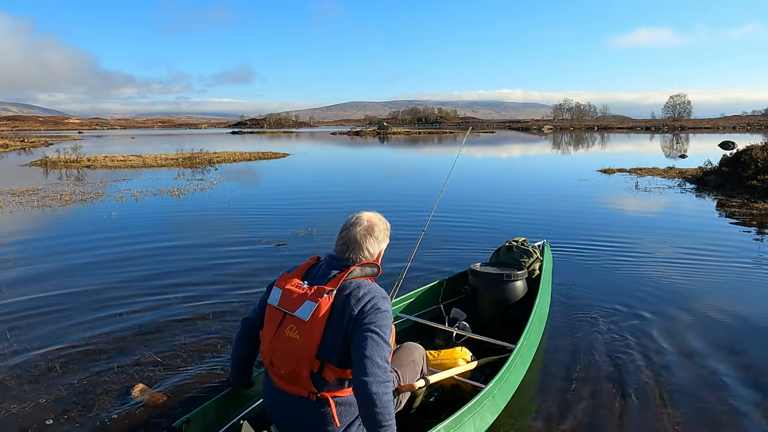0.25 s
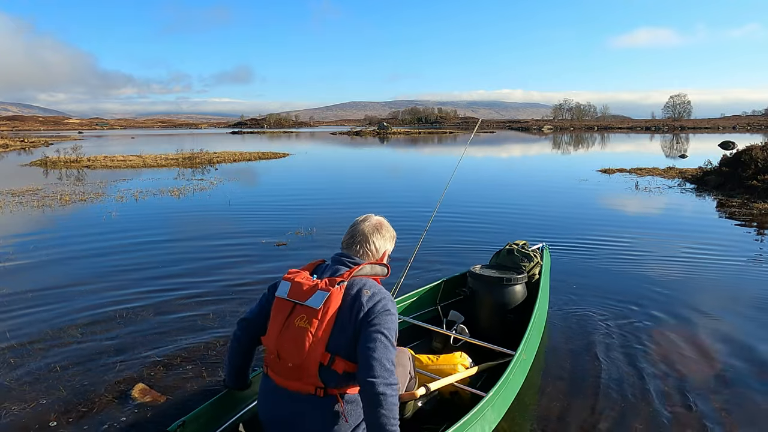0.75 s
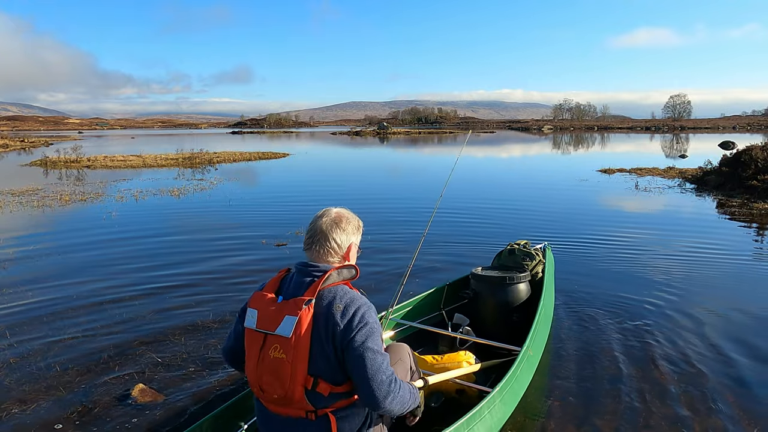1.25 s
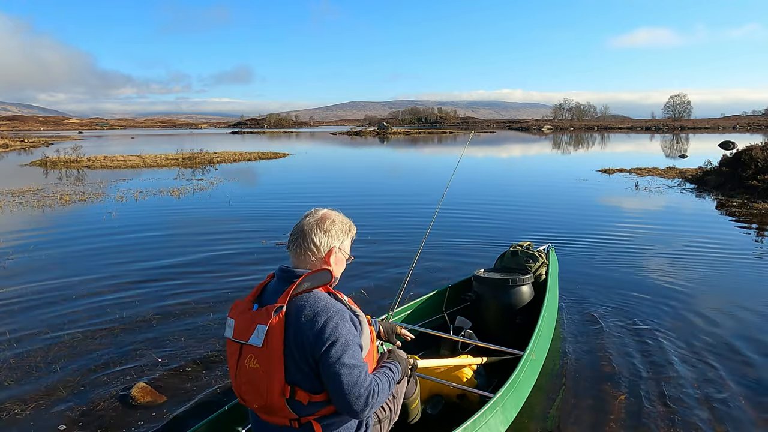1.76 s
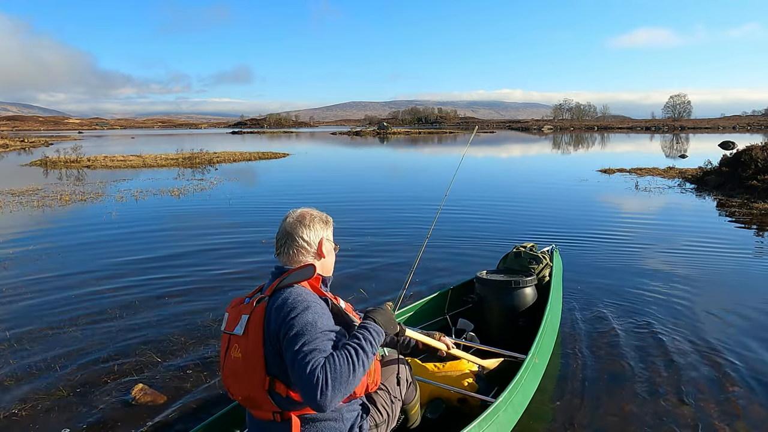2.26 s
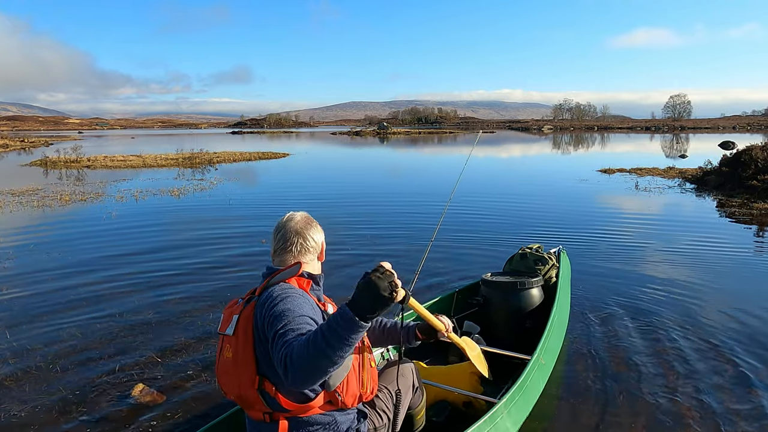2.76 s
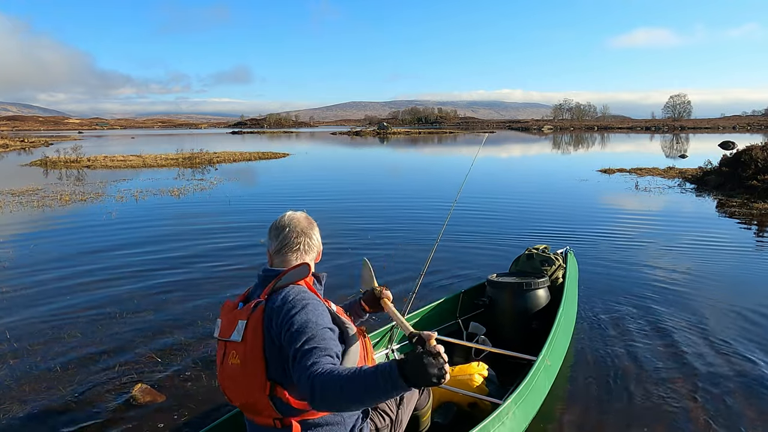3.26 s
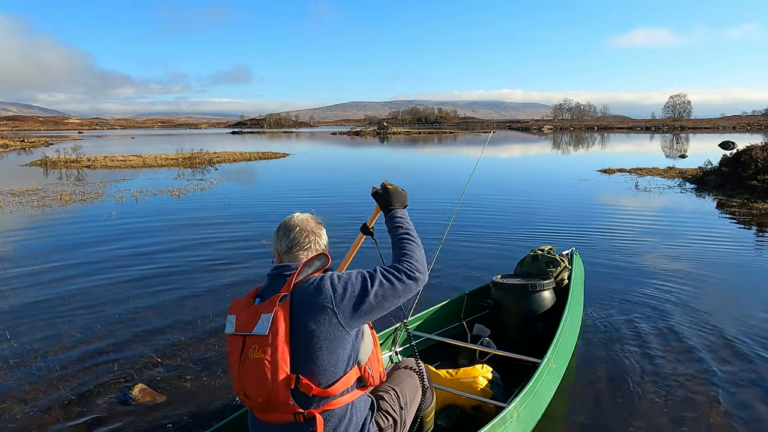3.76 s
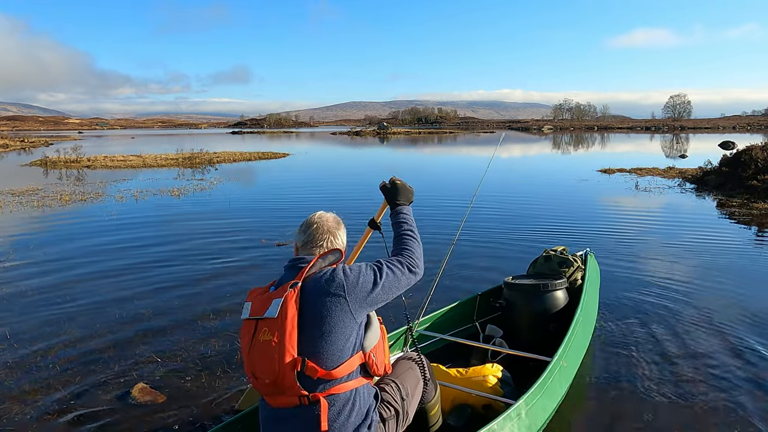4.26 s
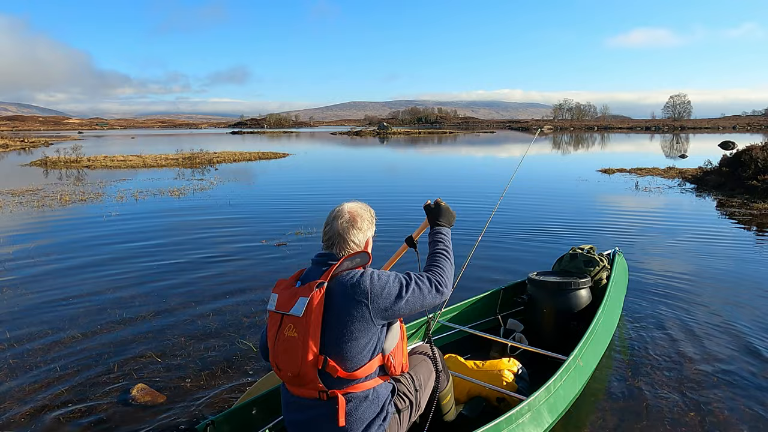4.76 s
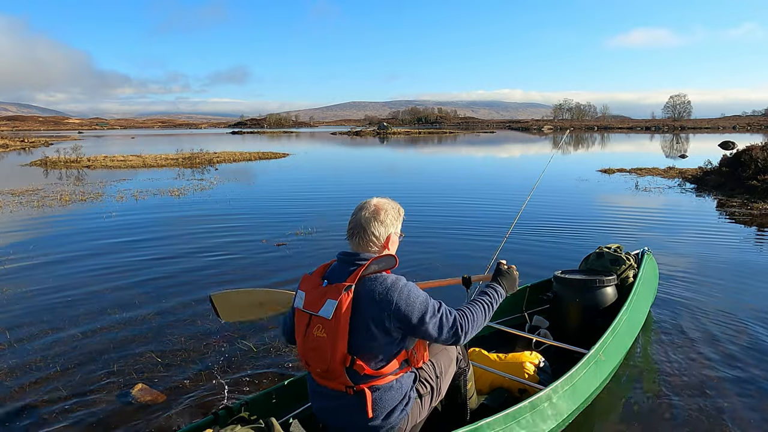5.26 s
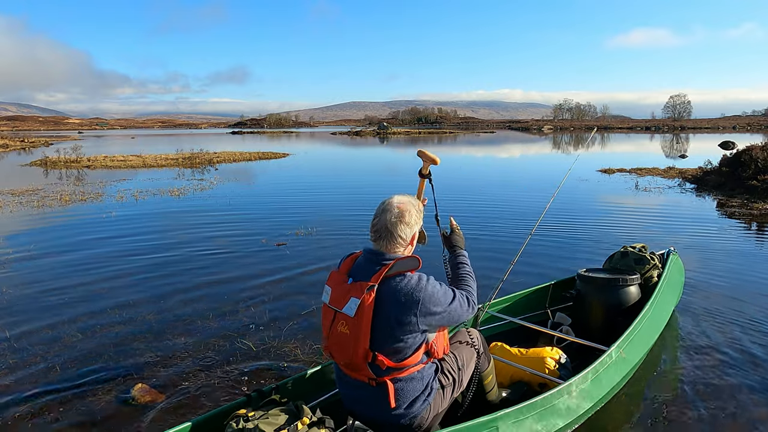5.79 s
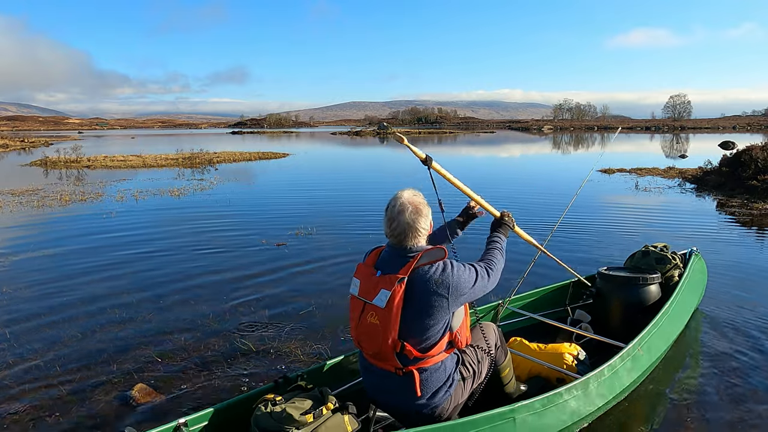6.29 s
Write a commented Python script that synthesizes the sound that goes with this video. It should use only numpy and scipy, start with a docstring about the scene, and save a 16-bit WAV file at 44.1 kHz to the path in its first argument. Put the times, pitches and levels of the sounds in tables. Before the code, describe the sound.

Close, dry clatter and low hull thumps as someone shifts in a small boat, followed by sparse taps, water drips and faint outdoor hush.

```python
"""On a lake shore, a paddler settles into a skin-on-frame canoe close to the microphone.
Knocks are a strike with dying rattle, scrapes are gritty noise; both ring the skin, hull and frame.
Weight and thumps stir deep hull and floor modes; a strap judders and rubber squeaks once.
Drops, bubbles and a small high tick ring briefly, over the faint, slowly drifting hush of the shore."""
import sys
import numpy as np
from scipy import signal
from scipy.fft import rfft, irfft, next_fast_len
from scipy.io import wavfile
from scipy.ndimage import uniform_filter1d

SR = 44100
rng = np.random.default_rng(int(sys.argv[2]) if len(sys.argv) > 2 else 0)


def pcm_store(signal):
    """Save signal as 16-bit PCM."""
    levels = np.round(np.clip(np.atleast_2d(signal), -1, 1) * 32767)
    wavfile.write(sys.argv[1], SR, levels.astype(np.int16).T)


N = 287973  # samples

# blows on hull and frame: (strike time [s], level [dB], clack relative to the level [dB])
KNOCKS = [(0.3754, -19, -10.5), (0.4342, -35.5, 1.5), (0.576, -58, -15), (0.658, -42, -24),
          (1.0399, -34.5, -6.5), (1.3238, -32, -24), (1.407, -39.5, -20), (1.444, -46, -24),
          (1.665, -39.5, -11.5), (1.772, -31, -19.5), (1.838, -39, -8), (2.1434, -30.5, -14),
          (2.311, -33, -10), (2.4303, -25.5, -4), (2.668, -43, 6), (2.682, -22.5, -15.5),
          (2.7297, -28.5, -30), (2.7522, -33, 2), (2.822, -42, -14.5), (2.883, -46, -15), (2.969, -34, -11),
          (3.0096, -35.5, -16), (3.111, -46.5, -14.5), (3.8046, -35, -14), (3.811, -34.5, -10),
          (3.9253, -41, -14), (4.565, -50.5, 7.5), (4.6555, -43.5, 0.5), (4.7649, -35.5, -4),
          (4.8902, -50.5, 5.5), (4.929, -39, -0.5), (5.1906, -23, 4.5), (5.8287, -41, 10.5),
          (5.8334, -38.5, 14.5), (5.896, -41.5, -7), (6.4278, -43.5, 0), (6.49, -51.5, 7), (6.5168, -55, 8)]
# cloth and gear dragged along the hull, one row a stroke:
# (start [s], length [s], level [dB], rustle relative to the level [dB])
STROKES = [(0.0, 0.013, -38, -9.5), (0.01, 0.052, -34, -8.5), (0.07, 0.053, -53, 0),
           (0.198, 0.075, -61.5, -6), (0.262, 0.11, -44.5, -4), (0.393, 0.084, -49.5, -13),
           (0.463, 0.068, -41, 3.5), (0.647, 0.21, -49, -5.5), (0.923, 0.19, -60, -10),
           (1.137, 0.058, -57, -7.5), (1.271, 0.084, -50, -6), (1.332, 0.057, -50.5, 0),
           (1.372, 0.084, -57.5, -1.5), (1.538, 0.082, -55.5, -11), (1.58, 0.075, -47.5, -2.5),
           (1.786, 0.13, -56, -4.5), (2.105, 0.13, -45, -10), (2.19, 0.17, -50, -2),
           (2.281, 0.11, -41.5, -7), (2.393, 0.034, -42, -7.5), (2.439, 0.037, -40.5, -3.5),
           (2.643, 0.16, -46, -11), (2.899, 0.053, -45, -6.5), (3.198, 0.0078, -69, 2),
           (3.823, 0.037, -52.5, -13), (3.923, 0.05, -54.5, -6), (3.955, 0.037, -51, -3),
           (4.189, 0.14, -61, -4.5), (4.347, 0.025, -64, 2), (4.392, 0.07, -67, 4), (4.527, 0.17, -67, 2),
           (4.581, 0.24, -55.5, -5), (5.203, 0.12, -67.5, 2.5), (5.278, 0.33, -67.5, 0.5),
           (5.64, 0.075, -68, 2), (5.663, 0.35, -59, -2), (6.123, 0.18, -65, 5.5),
           (6.311, 0.072, -76.5, 12)]
# jacket sleeves brushing, sent only to the fizz: (start [s], length [s], level [dB])
SLEEVES = [(4.349, 0.022, -70), (4.395, 0.032, -62), (4.525, 0.0064, -52.5), (4.555, 0.14, -71),
           (5.649, 0.055, -66.5)]
# the cloth settling after a stroke, one row each for skin, hull, frame, fizz: (level [dB])
TRAIL_DB = [
    [-11.5],
    [-17],
    [-16],
    [-15.5],
]
# weight shifting in the boat: (time [s], boom level [dB])
WEIGHT = [(0, -50), (.4, -38), (.62, -45.5), (1.3, -46), (1.45, -41.5), (1.62, -47), (2.62, -49.5),
          (2.71, -36.5), (2.87, -50.5), (4.55, -51), (4.72, -49.5), (5.04, -55), (5.71, -64.5), (6.3, -59)]
# boots and knees on the floor skin: (start [s], level [dB])
THUMPS = [(0.286, -26), (0.317, -26.5), (0.374, -25), (0.453, -29), (0.505, -29.5), (0.667, -35),
          (1.319, -31.5), (1.404, -29), (2.418, -26.5), (2.677, -25), (2.693, -24), (3.017, -40),
          (3.511, -44.5), (4.308, -36.5), (4.647, -29)]
# a strap juddering on the frame: (length [s], level [dB], mean slip rate [1/s])
JUDDER = (0.1, -41.5, 83)
# rubber slipping on the skin: (start [s], length [s], level [dB], first pitch [Hz], last pitch [Hz])
SQUEAKS = [(0.466, 0.022, -36, 1586, 2170)]
# drops, bubbles and a small high tick: (time [s], level [dB], starting pitch [Hz])
DROPS_AND_TICK = [(1.217, -42.5, 5440), (3.336, -47.5, 5800), (3.926, -47, 3530), (3.948, -43, 3930),
                  (3.96, -41, 1740), (3.967, -40, 1250), (3.977, -41, 2200), (4.039, -50.5, 1510),
                  (4.049, -50, 1690), (4.053, -43.5, 3430), (4.13, -43, 4000), (4.526, -41.5, 7450),
                  (5.327, -42, 1760), (5.358, -38.5, 1190), (5.371, -41.5, 2600), (5.389, -43, 6300),
                  (5.412, -42.5, 5430), (5.454, -43, 3430), (5.47, -41.5, 1300), (5.478, -43, 4140),
                  (5.493, -45.5, 2660), (5.551, -47, 5750), (5.658, -42, 8100)]
# the lifted blade draining: (start [s], length [s])
DRAIN = (5.28, .3)

# modes of the skin: (frequency [Hz], width [Hz], level [dB])
SKIN_MODES = [(467, 460, -5), (713, 334, -6), (1031, 149, 2.5)]
# modes of the hull: (frequency [Hz], width [Hz], level [dB])
HULL_MODES = [(1270, 268, 2), (1638, 370, 1.5), (2155, 570, -2)]
# modes of the frame: (frequency [Hz], width [Hz], level [dB])
FRAME_MODES = [(2480, 1080, 0.5), (3850, 2380, -2), (5660, 1450, -1.5), (7430, 980, -11)]
# cloth and the finest grit: (frequency [Hz], width [Hz], level [dB])
FIZZ_MODES = [(8900, 6300, -6), (12800, 1200, -14.5)]
# the whole hull flexing: (frequency [Hz], width [Hz], level [dB])
BOOM_MODES = [(54, 21, 2.5), (87.2, 17.6, 5)]
# the floor skin under weight: (frequency [Hz], width [Hz], level [dB])
FLOOR_MODES = [(134.8, 32.4, 0.5), (175, 46.5, -4.5), (232.6, 120, -7.5)]
# the hollow tube under the strap: (frequency [Hz], width [Hz], level [dB])
TUBE_MODES = [(620, 160, -2), (946, 143, 2), (1690, 370, -0.5), (2500, 540, -18), (3500, 1500, -19),
              (5900, 3100, -32)]

# colour of the shore air: (frequency [Hz], relative level per Hz [dB])
AIR_COLOUR = [(59, -54), (100, -6.5), (177, 6), (264, -12.5), (654, -19.5), (842, -20.5), (1210, -10.5),
              (2690, -24.5), (5060, -23.5), (11800, -40.5), (15500, -48)]
# stereo width of the boat: (frequency [Hz], side minus mid [dB])
WIDTH = [(60, -23.5), (400, -15.5), (4000, -12.5), (12000, -12)]
# tilt of the mid signal: (frequency [Hz], left minus right [dB])
LEAN = [(100, 0), (700, -1.5), (4000, 0.5)]

LOOSE_T60_S, HELD_T60_S = 0.051, 0.029  # loose gear rattles on; the held paddle taps drily; scaled by part
PADDLE_HELD_S = 3.6
STROKE_TAPER = 0.73  # share of a stroke spent swelling and easing
TRAIL_S = 0.051  # time constant of the settling cloth
TICKS_PER_S, TICK_DB, TICK_S = 70, 5, .0015  # buckles and grit catching: mean rate, top level, decay
THUMP_S = 0.035  # time scale of a thump, which peaks at a quarter of it
JUDDER_START_S = 3.444
AIR_DB = -60.5  # level of the air in the mid signal
DULL_HZ, EDGE_HZ = 13000, 15650  # microphone roll-off, band limit


def knocks():
    """Each blow is one firm strike and a burst of rattling that dies away, faster in the stiffer parts."""
    out = np.zeros((4, N))
    t = np.arange(6000) / SR
    part_t60 = np.array([[.7], [.65], [.6], [.45]])  # skin, hull, frame, fizz
    part_db = [[0], [0], [0], [-5]]
    for s, db, clack_db in KNOCKS:
        t60 = LOOSE_T60_S if s < PADDLE_HELD_S else HELD_T60_S
        rattle = rng.standard_normal(len(t)) * (1 - np.exp(-t / 0.0013))
        rattle[round(SR / 1000)] = 4.07  # the strike, 1 ms in
        fall_db = -60 * t / (t60 * part_t60)
        longer_shake = gain_of(-17.5 + 0.22 * fall_db)
        fall = gain_of(fall_db) + longer_shake
        add(out, s - .001, shares(db, clack_db) * gain_of(part_db) * fall * rattle)
    return out


def drag():
    """Gritty friction swells under each stroke and trails off; the grip comes and goes, part by part."""
    power = np.zeros((4, N))
    for s, length, db, rustle_db in STROKES:
        stroke = signal.windows.tukey(round(length * SR), STROKE_TAPER)
        add(power, s, (shares(db, rustle_db) * stroke) ** 2)
    for s, length, db in SLEEVES:
        brush = signal.windows.tukey(round(length * SR), .5)
        add(power[3], s, gain_of(2 * db) * brush)  # doubled dB: a power
    power = lag(power, 0.0021) + gain_of(TRAIL_DB) ** 2 * lag(power, TRAIL_S)
    # one grip shared by all parts, and one for each
    grip = uniform_filter1d(rng.standard_normal((5, N)), 400)
    clumps = gain_of(1.4 * evened(grip[0]) + 1.36 * evened(grip[1:]))
    catches = rng.random(N) * (rng.random(N) < TICKS_PER_S / SR)
    ticks = gain_of(TICK_DB) * TICK_S * SR * lag(catches, TICK_S)
    friction = np.array([grit(1.5, size=50) for _ in power])
    return np.sqrt(power) * evened(clumps + ticks) * friction


def boom():
    """Lumpy noise follows the weight to flex the hull and stir its floor; thumps strike the floor directly."""
    boom_db = np.interp(np.arange(N) / SR, *np.transpose(WEIGHT))
    push = gain_of(boom_db - 13.0) * grit(3.36, size=900)
    u = np.arange(round(4 * THUMP_S * SR)) / (THUMP_S * SR)
    for s, db in THUMPS:
        thump = np.sqrt(u) * np.exp(-2 * u) * rng.standard_normal(len(u))
        add(push, s, gain_of(db) * thump)
    flexing = evened(ring(grit(1.85, size=1500), BOOM_MODES))
    return gain_of(boom_db) * flexing + ring(push, FLOOR_MODES)


def judder():
    """Nearly even slips, each a puff of noise that rings the hollow tube under the strap."""
    length, db, rate = JUDDER
    out = np.zeros(N)
    t = np.arange(0, length, 1 / SR)
    wander = 1.9 * uniform_filter1d(rng.standard_normal(len(t)), size=200)
    turns = np.cumsum(rate * (1 + wander)) / SR
    slips = (0.74 + np.exp(-(turns % 1) / 0.13)) * rng.standard_normal(len(t))
    fade = np.minimum((length - t) / 0.043, 1)
    add(out, JUDDER_START_S, gain_of(db) * evened(slips) * fade)
    return ring(out, TUBE_MODES)


def squeaks():
    """Rubber slip as a short, shaky gliding stack of three harmonic partials."""
    out = np.zeros(N)
    for s, length, db, first_hz, last_hz in SQUEAKS:
        u = np.linspace(0, 1, round(length * SR))
        shake = 1 + 0.24 * uniform_filter1d(rng.standard_normal(len(u)), 40)
        pitch_hz = first_hz + (last_hz - first_hz) * u ** 2
        phase = 2 * np.pi * np.cumsum(shake * pitch_hz) / SR
        stack = sum(gain_of(-8.0 * k) * np.sin((k + 1) * phase) for k in range(3))
        add(out, s, gain_of(db) * stack * signal.windows.tukey(len(u), .4))
    return out


def drops_and_tick():
    """Drops, bubbles and a small high tick, and a spatter of 110 small drops while the blade drains."""
    out = np.zeros(N)
    for s, db, hz in DROPS_AND_TICK:
        add(out, s - .001, gain_of(db) * short_ring(hz))
    start, length = DRAIN
    for when, size, pitch in rng.random((110, 3)):
        hz = 1200 * 2 ** (2 * pitch ** 2.5)  # up to two octaves higher, mostly low
        db = -65.5 + 17 * size ** 2
        add(out, start + length * when, gain_of(db) * short_ring(hz))
    return out


def short_ring(hz):
    """A tone rings some cycles and mostly rises a little in pitch; its noisy onset grows with pitch."""
    t = np.arange(2000) / SR
    cycles = hz * t
    glide = rng.uniform(-.002, .004)
    ring_cycles = rng.uniform(4, 8)
    swell_and_decay = np.exp(-cycles / ring_cycles) * (1 - np.exp(-cycles / 0.28))
    tone = np.sin(2 * np.pi * cycles * (1 + glide * cycles)) * swell_and_decay
    onset = uniform_filter1d(rng.standard_normal(len(t)), size=3) * np.exp(-t / 0.00045)
    return tone + hz / 6000 * onset


def air():
    """The faint hush of shore and microphone: coloured noise, drifting a little in level."""
    return gain_of(AIR_DB) * evened(shaped(grit(1.0, size=4000), AIR_COLOUR))


def shares(db, bright_db):
    """Gains into skin, hull, frame and fizz: a hard, bright contact leaves the soft skin quiet."""
    skin = np.sqrt(1 / (1 + gain_of(1.24 * (bright_db + 9))))
    hull = np.sqrt(1 - skin ** 2)
    frame = gain_of(bright_db)
    fizz = gain_of(1.19 * bright_db - 14)
    return gain_of(db) * np.array([[skin], [hull], [frame], [fizz]])


def ring(x, modes):
    """Passes x through damped modes, each a doubled resonance; white noise keeps its power."""
    t = np.arange(8192) / SR
    body = np.zeros(len(t))
    for k, (hz, width, db) in enumerate(modes):
        # 1.55 offsets the narrowing by the doubling
        decay = width ** 2 * t * np.exp(-np.pi * 1.55 * width * t)
        body += (-1) ** k * gain_of(db) * decay * np.sin(2 * np.pi * hz * t)
    return signal.oaconvolve(x, body / np.linalg.norm(body))[:N]


def grit(spread_db, size):
    """Noise whose level wanders over grains of the given size in samples."""
    grains = uniform_filter1d(rng.standard_normal(N), size)
    return evened(rng.standard_normal(N) * gain_of(spread_db * evened(grains)))


def shaped(x, points):
    """Colours x by a (frequency [Hz], level [dB]) spectrum, interpolated over log frequency."""
    size = next_fast_len(N)
    hz, db = np.transpose(points)
    log_hz = np.log(np.fft.rfftfreq(size, 1 / SR) + 1)
    gain = gain_of(np.interp(log_hz, np.log(hz), db))
    return irfft(rfft(x, size) * gain, size)[:N]


def lag(x, seconds):
    """One-pole smoothing with the given time constant."""
    keep = np.exp(-1 / (seconds * SR))
    return signal.lfilter([1 - keep], [1, -keep], x)


def gain_of(db):
    """Decibels to amplitude gain."""
    return 10 ** (np.asarray(db) / 20)


def evened(x):
    """Scales to rms 1."""
    return x / np.sqrt(np.mean(x ** 2) + 1e-20)


def add(mix, s, sound):
    """Mixes a sound in at time s [s], cut at the end of the mix."""
    part = mix[..., round(s * SR):][..., :sound.shape[-1]]
    part += sound[..., :part.shape[-1]]


def scene():
    """Sums the boat and air, then spreads them from mid and side to left and right."""
    skin, hull, frame, fizz = drag() + knocks()
    contact = ring(skin, SKIN_MODES) + ring(hull, HULL_MODES)
    contact += ring(frame, FRAME_MODES) + ring(fizz, FIZZ_MODES)
    boat = contact + boom() + judder() + squeaks() + drops_and_tick()
    # every sound of the boat wanders left or right at random
    place = evened(uniform_filter1d(rng.standard_normal(N), size=2000))
    # a quarter-cycle phase shift widens the image
    shifted = signal.hilbert(boat, next_fast_len(N))[:N].imag
    side = shaped(0.63 * place * boat + 0.78 * shifted + 2.4 * air(), WIDTH)
    mid = boat + air()
    left = shaped(mid, [(hz, db / 2) for hz, db in LEAN])
    right = shaped(mid, [(hz, -db / 2) for hz, db in LEAN])
    return np.array([left + side, right - side])


def record(dry):
    """The microphone dulls the highest treble; a steep low-pass then sets the band limit."""
    dulled = signal.lfilter(*signal.butter(4, DULL_HZ, fs=SR), dry)
    band_limit = signal.firwin(511, EDGE_HZ, window=("kaiser", 9), fs=SR)
    return signal.oaconvolve(dulled, band_limit[None], "same")


dry = scene()
out = record(dry)
pcm_store(out)
```